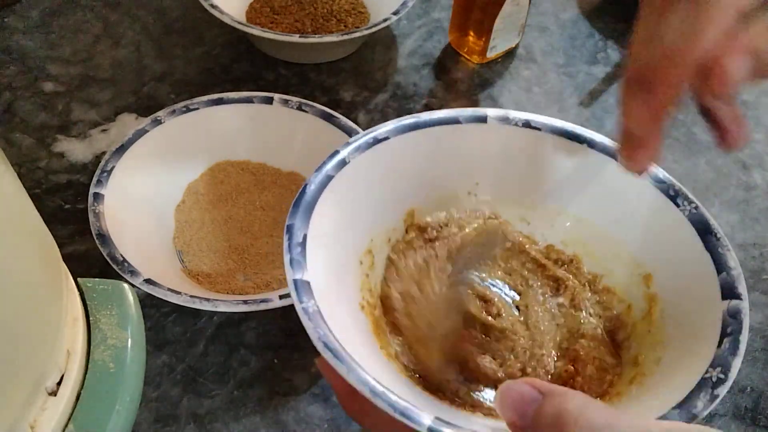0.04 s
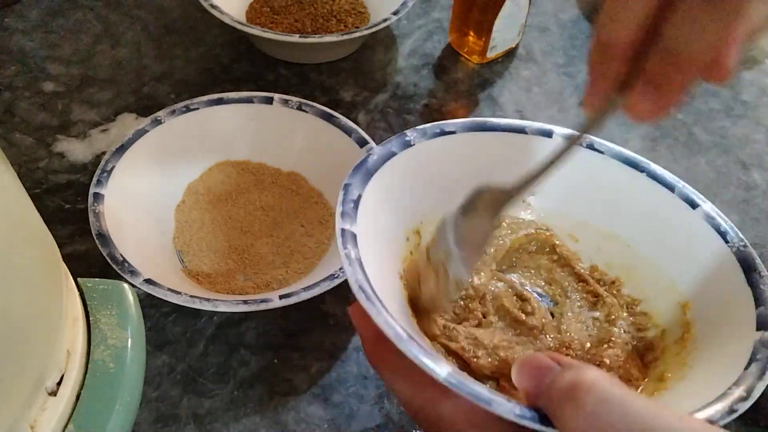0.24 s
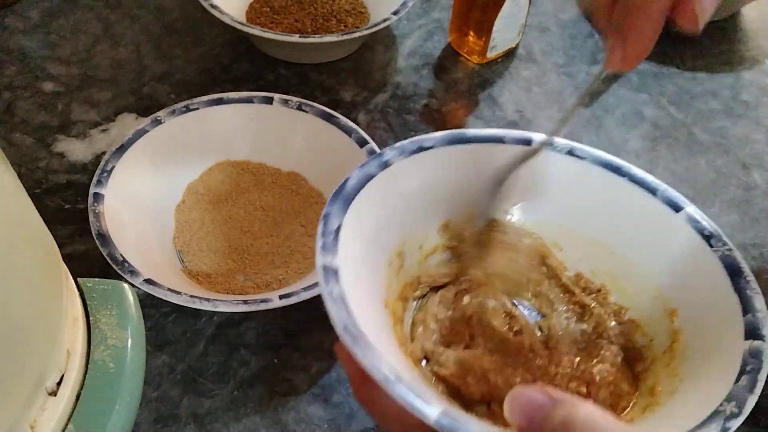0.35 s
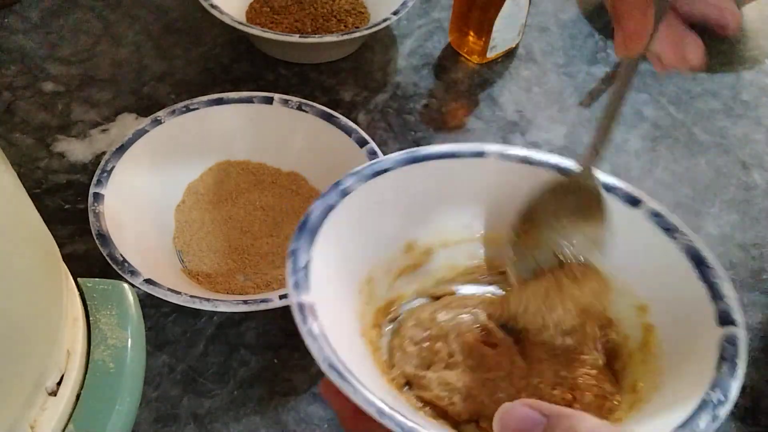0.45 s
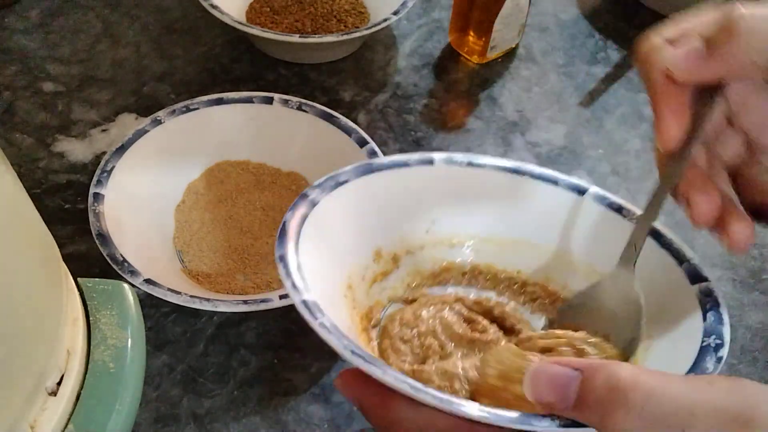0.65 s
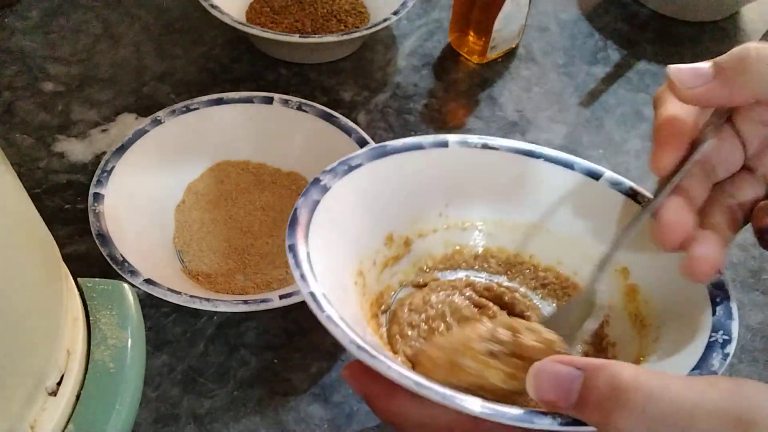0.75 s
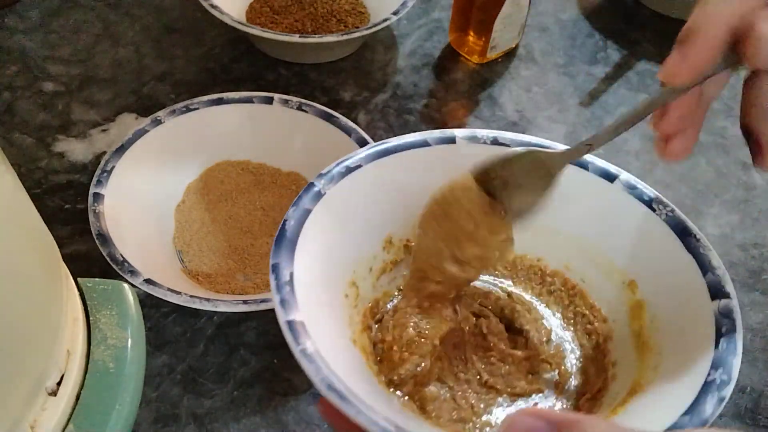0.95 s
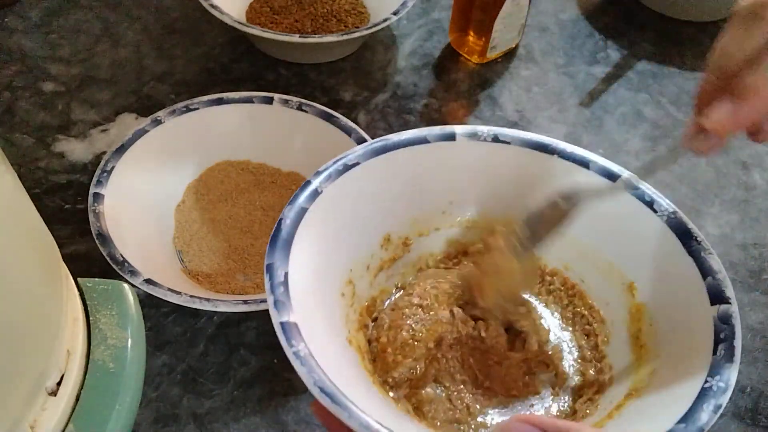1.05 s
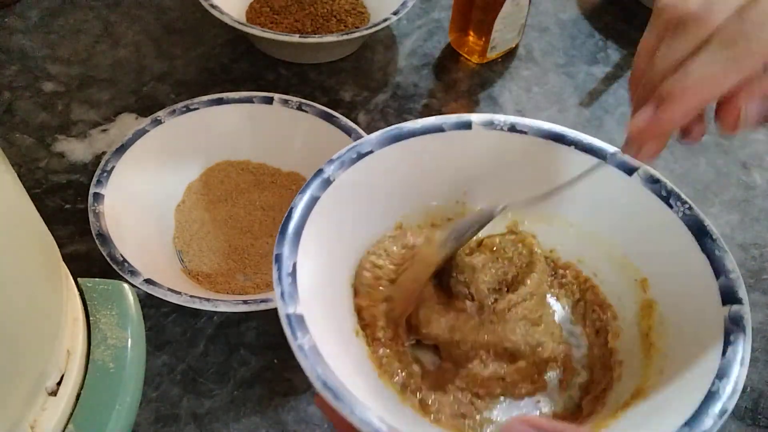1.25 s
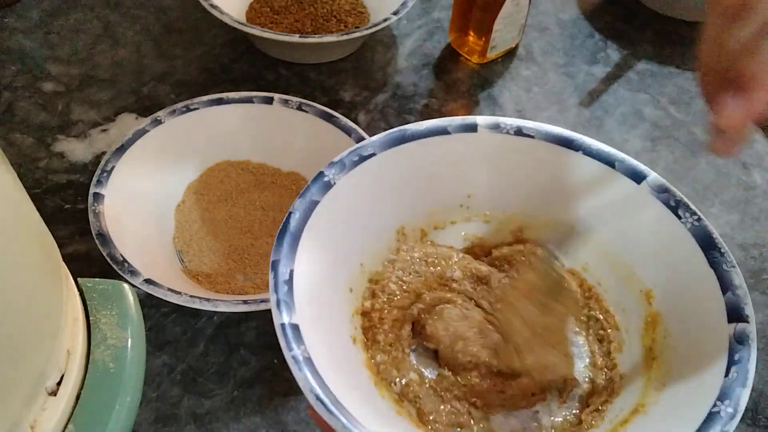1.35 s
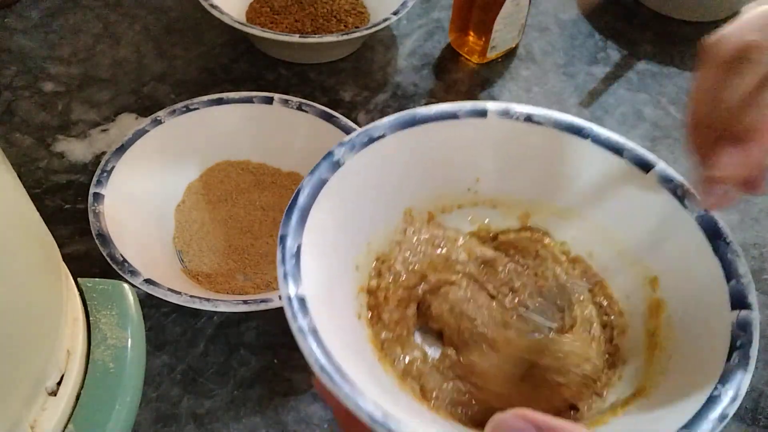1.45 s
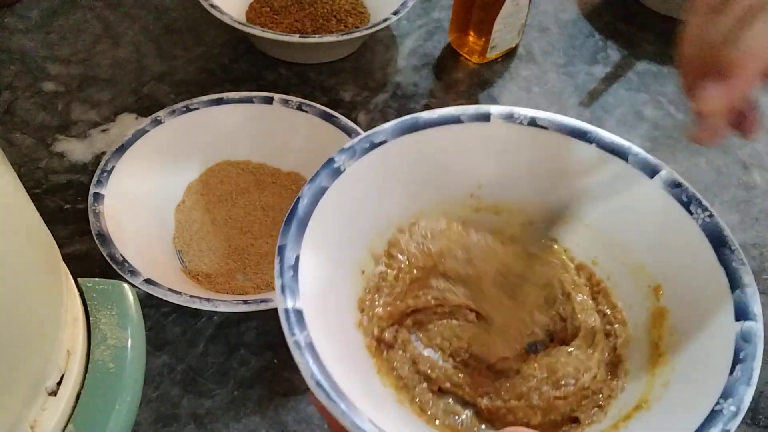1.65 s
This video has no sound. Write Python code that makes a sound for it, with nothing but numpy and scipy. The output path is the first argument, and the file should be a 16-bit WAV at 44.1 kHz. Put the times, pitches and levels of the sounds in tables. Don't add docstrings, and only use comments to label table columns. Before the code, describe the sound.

Close, dry stirring of thick paste with a metal spoon: the edge drags on glaze, knocks the bowl wall sharply, scrapes on in two passes, lands softly and slides to rest, with faint room hum and hiss.

```python
import sys
import numpy as np
from scipy import signal
from scipy.fft import rfft, irfft, next_fast_len
from scipy.io import wavfile
from scipy.ndimage import uniform_filter1d, map_coordinates

SR = 44100
rng = np.random.default_rng(int(sys.argv[2]) if len(sys.argv) > 2 else 0)


def gain_from_db(level_db):
    decades = np.asarray(level_db, float) / 20
    return 10 ** decades


def master(y):
    cut = np.clip(np.atleast_2d(y).T, -1, 1)
    pcm = np.round(cut * 32767)
    wavfile.write(sys.argv[1], SR, pcm.astype(np.int16))


N = 74970
TIME = np.arange(N) / SR


def unit(x):
    return x / np.sqrt(np.mean(np.abs(x) ** 2) + 1e-20)


def curves(rows, fade_s=0.024):
    s, db, *cols = np.transpose(rows)
    outside_s = np.maximum(s[0] - TIME, TIME - s[-1])
    fade = np.clip(1 - outside_s / fade_s, 0, 1)
    gain = gain_from_db(np.interp(TIME, s, db)) * fade
    return [gain] + [np.interp(TIME, s, c) for c in cols]


def wobble(rate):
    knots = rng.standard_normal(int(N * rate / SR) + 4)
    return map_coordinates(knots, [TIME * rate])


def coloured(x, points):
    m = next_fast_len(N + 8192)
    f, db = np.transpose(points)
    hz = np.fft.rfftfreq(m, 1 / SR)
    gain = gain_from_db(np.interp(np.log(hz + 1), np.log(f), db, -120, -120))
    return unit(irfft(rfft(x, m) * gain, m)[:N])


def patchy(depth_db, bins, frames):
    z = signal.stft(rng.standard_normal(N), nperseg=512)[2]
    field = uniform_filter1d(rng.standard_normal(z.shape), bins, 0)
    field = uniform_filter1d(field, frames, 1)
    return signal.istft(z * gain_from_db(depth_db * unit(field)), nperseg=512)[1][:N]


def slips(rate, spread_db):
    u, size = rng.random(N), rng.exponential(size=N)
    happens = u < rate / SR
    sign = np.sign(u * SR / rate - .5)
    return happens * sign * gain_from_db(spread_db * np.minimum(size, 4) + 0.5 * wobble(60.97))


def ring(x, hz, width_hz):
    turn = np.exp(2j * np.pi * np.cumsum(hz + np.zeros(len(x))) / SR)
    pole = np.exp(-np.pi * 1.9 * abs(width_hz) / SR)
    low = signal.lfilter([1], np.poly([pole] * 4), x / turn)
    return unit((low * turn).real)


def stroke(gain, drift_hz, modes, spread_db):
    x = slips(1800, spread_db)
    return gain * unit(sum(gain_from_db(db) * ring(x, hz + share * drift_hz, w) for hz, w, db, share in modes))


def air():
    # (frequency [Hz], level [dB per Hz])
    hum_spectrum = [(25, -27), (60, -15.5), (110, 2.5), (160, -4), (200, -10.5), (330, -1.5), (1500, -7),
                    (3300, -19)]
    # (frequency [Hz], level [dB per Hz])
    fizz_spectrum = [(2600, -11.5), (4000, -16.5), (6600, 4.5), (8000, -7.5), (10000, -11.5), (12000, -10),
                     (15500, -10)]
    # (time [s], level [dB])
    duck = [(0, -1), (.2, 0.5), (.8, 1.5), (.9, -2.5), (1.08, 0), (1.4, 1), (1.45, 1.5), (1.7, -4.5)]
    hum_db, fizz_db, streak_db = -77.5, -75, 4.5
    hum = coloured(patchy(depth_db=2.5, bins=2, frames=10), hum_spectrum)
    fizz = coloured(patchy(streak_db, bins=1, frames=40), fizz_spectrum)
    return gain_from_db(hum_db) * hum + gain_from_db(fizz_db) * curves(duck)[0] * fizz


def ticks():
    # (time [s], peak level [dB], frequency [Hz])
    snaps = [
        (1.227, -43.5, 12700),
        (1.355, -58.5, 13300),
        (1.361, -67, 13330),
        (1.442, -51, 14500),
        (1.4425, -62, 6000),
        (.105, -64, 13500),
        (1.675, -62, 11500),
        (1.522, -60, 7000),
        (1.54, -63, 6700),
        (1.68, -54, 3230),
    ]
    cycles = 2.2
    out = np.zeros(N)
    for s, db, hz in snaps:
        t = TIME - s
        out += gain_from_db(db) * np.exp(-(t * hz / cycles) ** 2) * np.sin(2 * np.pi * hz * t)
    return out


def grazes():
    # (time [s], length [s], frequency [Hz], level [dB])
    touches = [(0, 0.015, 1170, -72.5), (0, 0.045, 3140, -76), (0.14, 0.14, 6800, -71.5),
               (0.332, 0.014, 6790, -55), (0.327, 0.021, 8200, -63.5), (0.328, 0.01, 10900, -64.5),
               (0.465, 0.083, 3370, -62), (0.5, 0.05, 4820, -61), (0.469, 0.065, 7000, -61),
               (0.83, 0.06, 2500, -72), (0.608, 0.044, 1200, -80), (0.625, 0.025, 3800, -63),
               (0.617, 0.1, 8080, -65), (0.632, 0.13, 2326, -67.5), (1.115, 0.038, 10600, -79.5),
               (1.109, 0.055, 7210, -68), (1.111, 0.11, 4800, -70.5), (1.115, 0.041, 3520, -68),
               (1.445, 0.18, 6650, -76.5), (1.284, 0.09, 6690, -72.5), (1.335, 0.07, 4670, -76),
               (1.335, 0.049, 3200, -76.5), (1.445, 0.12, 8330, -78), (1.446, 0.02, 4900, -74),
               (1.448, 0.019, 1131, -80), (1.685, 0.02, 5100, -73), (1.645, .06, 4630, -73.5),
               (1.669, 0.019, 2710, -64), (1.665, .035, 3250, -68), (1.671, 0.033, 560, -66)]
    edge_s, width_over_centre = 0.0089, 0.054
    out = np.zeros(N)
    for s, length, hz, db in touches:
        shape = np.clip(np.minimum(TIME - s, (s + length - TIME) / 4) / edge_s + 1, 0, 1) ** 2
        on = shape > 0
        level_db = db + 2.72 * wobble(45.11)[on] - 1.5 * (TIME[on] - s) / length
        centre_hz = hz * (1 + 0.016 * wobble(23.02)[on])
        touch = ring(slips(2200, spread_db=2)[on], centre_hz, width_over_centre * hz)
        out[on] += gain_from_db(level_db) * shape[on] * touch
    return out


def catches():
    # (time [s], peak level [dB], frequency [Hz])
    snags = [(.1047, -48, 1957), (0.111, -45.5, 1890), (.1326, -47, 2140), (.147, -49, 1996),
             (.424, -47, 1570), (.444, -47, 1690), (.462, -49, 1650), (.524, -52, 3450), (.524, -56, 4700),
             (0.613, -52, 3130), (.638, -49, 3440), (0.796, -45, 1690), (0.8133, -45.5, 1568),
             (.852, -47, 1740), (.873, -49, 1820), (.8855, -47.5, 1790), (.899, -48, 1746),
             (0.9223, -47, 1750), (0.9347, -47.5, 1570), (0.9699, -50, 1773), (1.134, -42.5, 2567),
             (1.142, -40, 628), (1.164, -44, 1007), (1.172, -43.5, 1010), (1.19, -48.5, 790),
             (1.21, -54, 2190), (1.332, -62, 4615), (1.446, -62, 4670), (1.559, -62, 735),
             (.612, -59, 1200), (.632, -60, 1200), (.39, -47, 1600), (.384, -50, 1500), (.668, -58, 3400),
             (1.108, -60, 700), (1.346, -67, 3100)]
    rise_s = .0013
    out = np.zeros(N)
    for s, db, hz in snags:
        after = np.maximum(TIME - s, 0) / rise_s / 2
        swell = (after * np.exp(1 - after)) ** 2
        out += gain_from_db(db) * swell * np.sin(2 * np.pi * hz * (TIME - s))
    return out


def squeals():
    # (time [s], length [s], frequency [Hz], level [dB])
    tones = [(.005, .085, 1435, -61), (0.034, .06, 1870, -63), (.742, .095, 1560, -56.5),
             (1.03, .065, 2290, -74), (1.12, 0.029, 860, -60), (1.135, 0.028, 1469, -57.5),
             (1.25, .085, 1790, -73), (1.402, 0.022, 2700, -76.5), (.62, .012, 750, -71),
             (.465, 0.034, 3430, -62), (0.652, .012, 2290, -63), (.716, .012, 1550, -66),
             (.105, .05, 1430, -69), (.305, .045, 745, -55), (1.452, .015, 1120, -71),
             (1.02, .07, 1800, -66), (.615, .03, 2290, -68), (1.115, .035, 3520, -66),
             (.43, .015, 740, -64)]
    edge_s, sag_db, shake_db = .012, 3.5, 3
    out = np.zeros(N)
    for s, length, hz, db in tones:
        shape = np.clip(np.minimum(TIME - s, (s + length - TIME) / 2) / edge_s + 1, 0, 1) ** 2
        level_db = db + shake_db * wobble(70) - sag_db * np.clip((TIME - s) / length, 0, 2)
        phase = 2 * np.pi * np.cumsum(hz * (1 + .006 * wobble(59.8))) / SR
        out += shape * gain_from_db(level_db + 3) * np.sin(phase)
    return out


def grit():
    # (time [s], level [dB])
    grinding = [(0, -74.5), (.1, -87.5), (.21, -102), (.225, -63.5), (.3, -68.5), (.335, -60), (.39, -66.5),
                (.46, -57), (.52, -57.5), (.575, -68), (.605, -61.5), (.635, -59), (.72, -62.5), (.76, -70),
                (.86, -89), (1.1, -119), (1.14, -63), (1.3, -84)]
    # (frequency [Hz], width [Hz], level [dB])
    spoon_modes = [(3108, 92, 3), (3900, 200, -8.5), (4705, 230, -9), (6790, 340, -2.5)]
    # (frequency [Hz], level [dB per Hz])
    hiss_spectrum = [(1500, -25), (2400, -8), (3500, -5), (6000, -11), (8500, -13.5), (9500, -21),
                     (15500, -25.5)]
    hiss_db, grains_per_s = 6, 5900
    x = slips(grains_per_s, spread_db=2.5)
    swell_db = 3 * np.array([wobble(16) for _ in spoon_modes])
    rings = unit(sum(gain_from_db(db + s) * ring(x, hz, w) for (hz, w, db), s in zip(spoon_modes, swell_db)))
    return curves(grinding)[0] * gain_from_db(-4.0) * (rings + gain_from_db(hiss_db) * coloured(x, hiss_spectrum))


def bump():
    # (time [s], level [dB])
    landing = [
        (1.108, -71.5),
        (1.13, -57),
        (1.136, -48.5),
        (1.146, -48),
        (1.17, -53),
        (1.21, -57),
        (1.27, -71.5),
        (1.31, -89),
    ]
    # (frequency [Hz], width [Hz], level [dB], share of the tuning rise [0-1])
    land_modes = [(562, 86, -6, 0.48), (858, 280, 0.5, 0.64), (1464, 64, -8.5, 0), (1790, 56, -3, 0.013),
                  (2090, 370, -7.5, 0), (2585, 300, -3.5, 0.026), (3480, 61, -10, 0.23),
                  (6740, 520, -15, 0.93)]
    rise_hz_per_s = 2700
    gain = curves(landing)[0] * gain_from_db(1.4 * wobble(120))
    return stroke(gain, rise_hz_per_s * (TIME - 1.15), land_modes, spread_db=2.5)


def bowl(s):
    # (frequency [Hz], level [dB], time to fall 60 dB [s])
    bowl_modes = [(461, 5.5, 0.014), (698.4, -9.5, .09), (799, 3.5, .035), (928, 6, 0.019),
                  (1013, -10, .067), (1170, 10.5, 0.027), (1501, 6.5, .033), (1668, 6, .016),
                  (1867, 3.1, .021), (2254, 2.5, 0.014), (2437, -12.5, 0.034), (2702, -5.5, .035),
                  (2913, -4.5, .02), (3400, -9, .012)]
    t = np.maximum(TIME - s, 0)
    onset = 1 - np.exp(-t / 0.00035)
    return sum(gain_from_db(db - 60 * t / t60) * np.sin(2 * np.pi * hz * t) for hz, db, t60 in bowl_modes) * onset


def knock_rumble():
    # (time [s], level [dB])
    rumble_level = [
        (.234, -46.5),
        (.243, -47.5),
        (.3, -50),
        (.34, -51.5),
        (.39, -58.5),
        (.48, -69),
        (.53, -73),
    ]
    # (frequency [Hz], level [dB per Hz])
    thud_spectrum = [(200, -80.5), (320, -7), (550, -15), (780, -2), (1150, -2), (1330, -11.5),
                     (1500, -5.5), (4000, -23.5), (6000, -43)]
    low_edge_hz, edge_rise_hz_per_s = 298, 3500
    hz, when, z = signal.stft(coloured(slips(2500, spread_db=1), thud_spectrum), SR, nperseg=512)
    edge = low_edge_hz + edge_rise_hz_per_s * np.maximum(when - .3, 0)
    keep = 1 / np.sqrt(1 + (edge / (hz[:, None] + 1)) ** 8)
    rumble = signal.istft(z * keep, SR, nperseg=512)[1][:N]
    return gain_from_db(3.5) * curves(rumble_level)[0] * rumble


def knock():
    # (frequency [Hz], level [dB])
    crack_spectrum = [(1000, -8), (3000, -1), (8000, -14), (10500, -28), (15500, -41)]
    knock_s, knock_db = .21702, -27.5
    rebound_s, rebound_db = .241, -15
    crack_db, crack_t60_s = -36.5, 0.042
    t = np.maximum(TIME - knock_s, 0)
    modes = bowl(knock_s) + gain_from_db(rebound_db) * bowl(rebound_s)
    blow = signal.sosfilt(signal.butter(4, 410, 'high', fs=SR, output='sos'), modes)
    crack = coloured(rng.standard_normal(N), crack_spectrum) * gain_from_db(crack_db - 60 * t / crack_t60_s) * (t > 0)
    return -gain_from_db(knock_db) * blow + crack + knock_rumble()


def drags():
    # (time [s], level [dB], tuning of the contact [Hz])
    first_pass = [
        (0, -57, 2030),
        (.05, -62, 1954),
        (.098, -59.5, 1880),
        (.132, -57.5, 2030),
        (.2, -56, 2004),
    ]
    second_pass = [
        (.24, -47.5, 1520),
        (.3, -55.5, 1537),
        (.34, -52, 1570),
        (.38, -56.5, 1570),
        (.43, -51.5, 1637),
        (.51, -56.5, 1620),
        (.58, -61.5, 1710),
        (.64, -71, 1761),
    ]
    third_pass = [
        (.715, -77, 1570),
        (.745, -63.5, 1510),
        (.78, -55.5, 1544),
        (.814, -52.5, 1545),
        (.845, -55, 1690),
        (.894, -53.5, 1673),
        (1.012, -62.5, 1700),
        (1.1, -72, 1850),
    ]
    # (frequency [Hz], width [Hz], level [dB], share of the tuning drift [0-1])
    first_sings = [(1880, 220, -1.5, 0.4), (2140, 47, -8, 0.6), (2294, 41, -18, 0), (2677, 150, -8, 0)]
    second_sings = [(1590, 120, 0, 1.01), (2000, 120, -9, 0)]
    third_sings = [(1570, 58, -6, 0.31), (1738, 178, 2.5, 0.78), (2854, 140, -9, 0.053)]
    out = np.zeros(N)
    for rows, modes in ((first_pass, first_sings), (second_pass, second_sings), (third_pass, third_sings)):
        gain, hz = curves(rows)
        drift_hz = hz - np.mean([r[-1] for r in rows])
        out += stroke(gain, drift_hz, modes, spread_db=0.5)
    return out


def scene():
    background = air() + ticks()
    touches = grazes() + catches() + squeals()
    return (background + touches + grit() + bump() + knock() + drags())[None]


def suppress(x):
    gate_from_hz, gate_over, gate_floor_db = 3700, 0.53, -3
    smear_db, top_hz = 4, 15600
    hz, _, z = signal.stft(x, SR, nperseg=512, noverlap=384)
    treble = hz[:, None] > gate_from_hz
    power = uniform_filter1d(np.abs(z) ** 2, size=15, axis=-1) + 1e-20
    quiet = uniform_filter1d(np.percentile(power, 25, axis=-1), size=25, axis=-1)[..., None]
    gain = np.clip(1 - gate_over * quiet / power * treble, gain_from_db(gate_floor_db), 1)
    streaks = uniform_filter1d(rng.standard_normal(z.shape), size=50, axis=-1)
    gain = gain * gain_from_db((smear_db * unit(streaks) - 1) * treble)
    return signal.istft(z * gain * (hz[:, None] < top_hz), SR, nperseg=512, noverlap=384)[1][..., :N]


def low_pass(x):
    return signal.sosfilt(signal.butter(12, 16100, fs=SR, output="sos"), x)


def record(dry):
    mix = suppress(dry)
    return low_pass(mix)


dry = scene()
out = record(dry)
master(out)
```